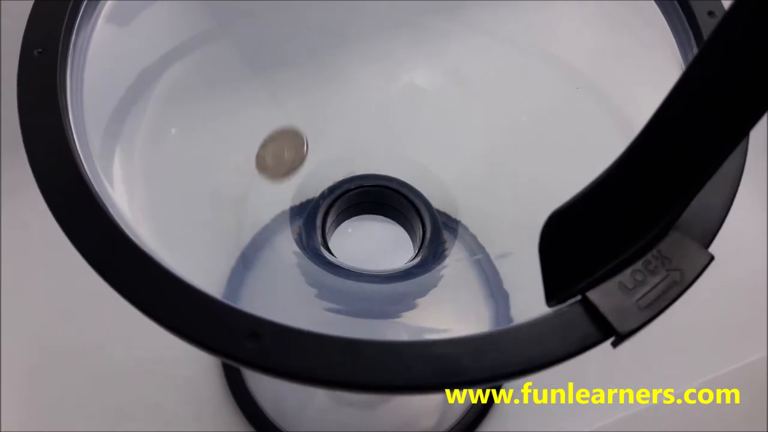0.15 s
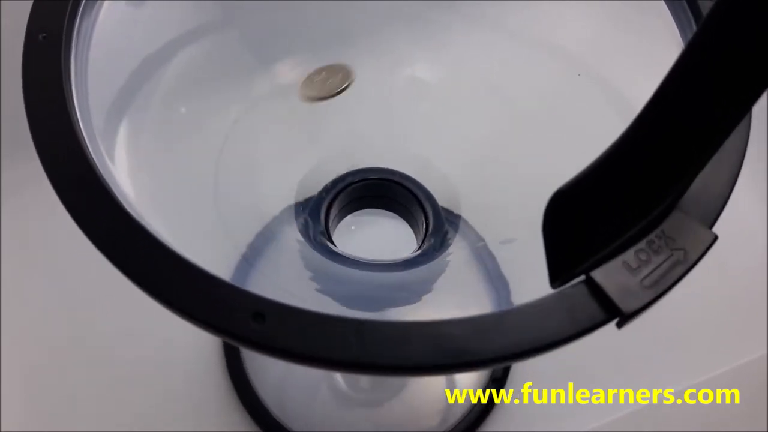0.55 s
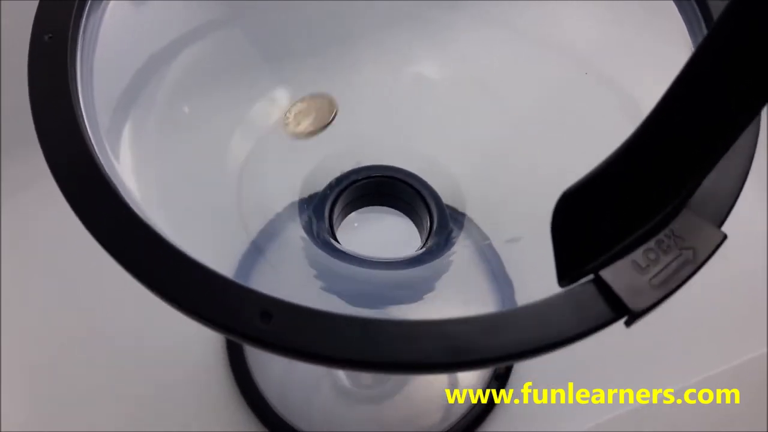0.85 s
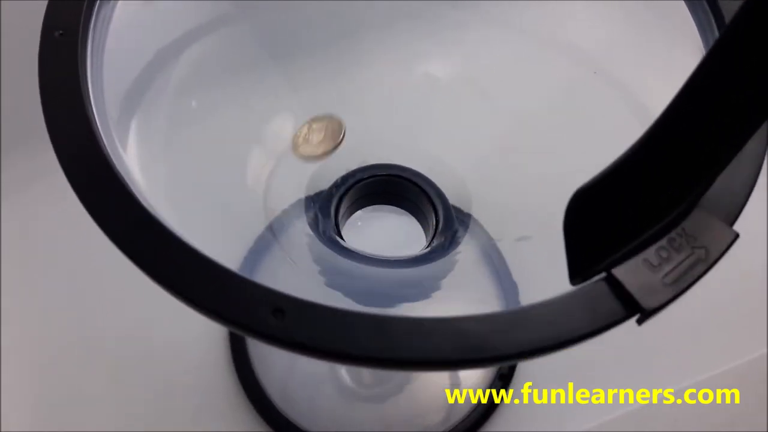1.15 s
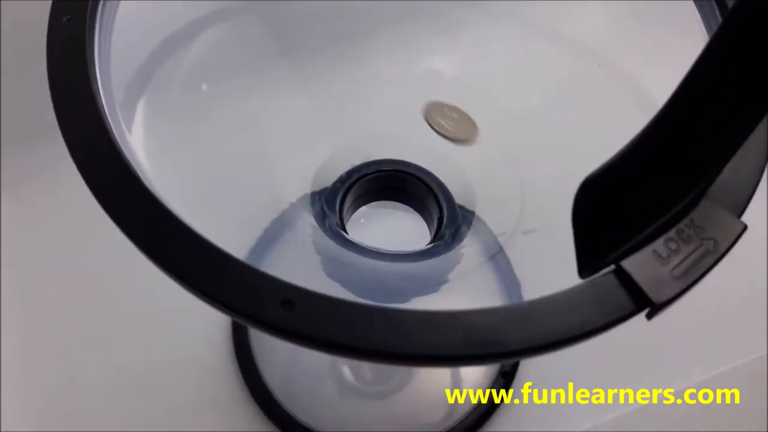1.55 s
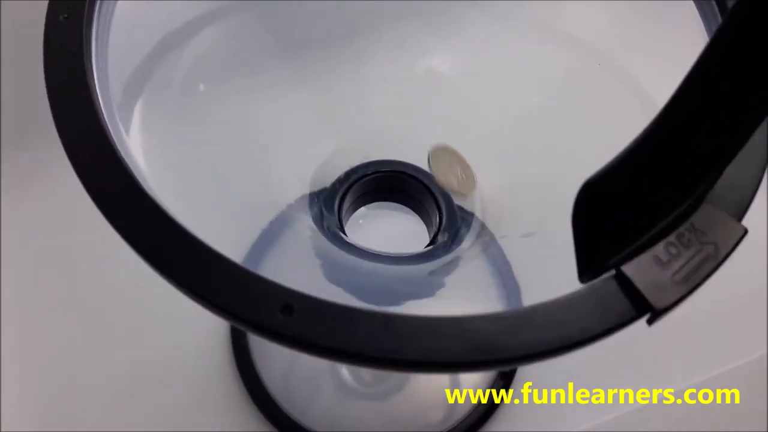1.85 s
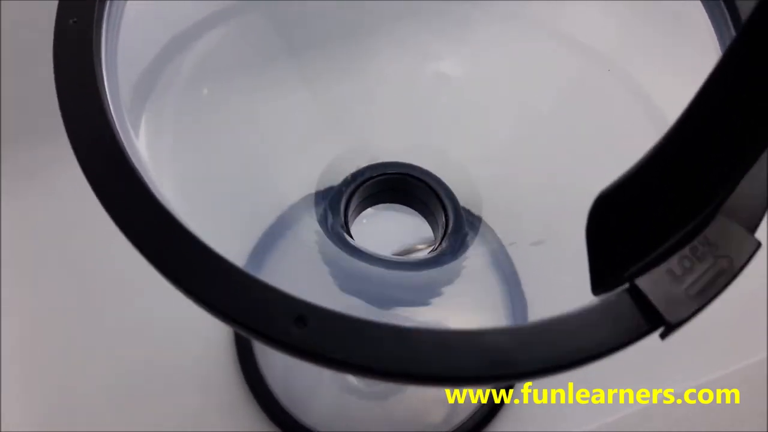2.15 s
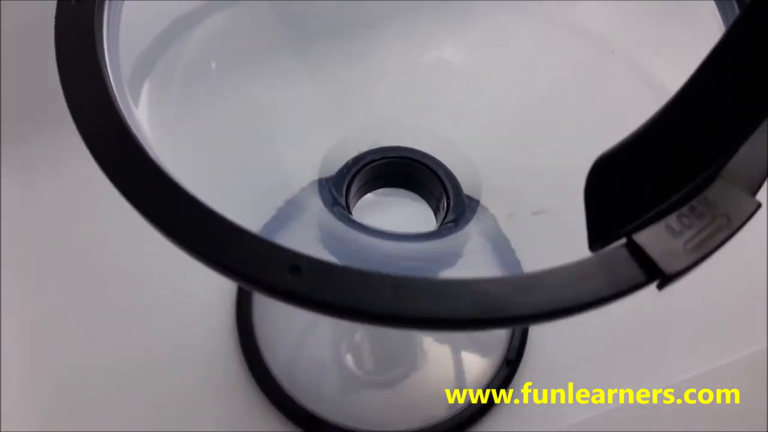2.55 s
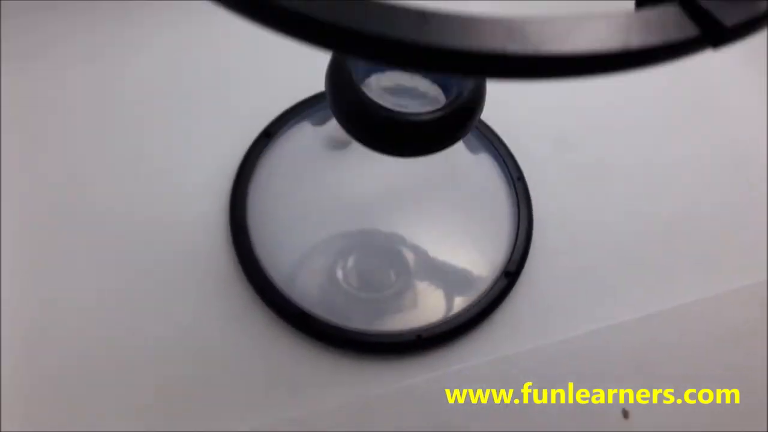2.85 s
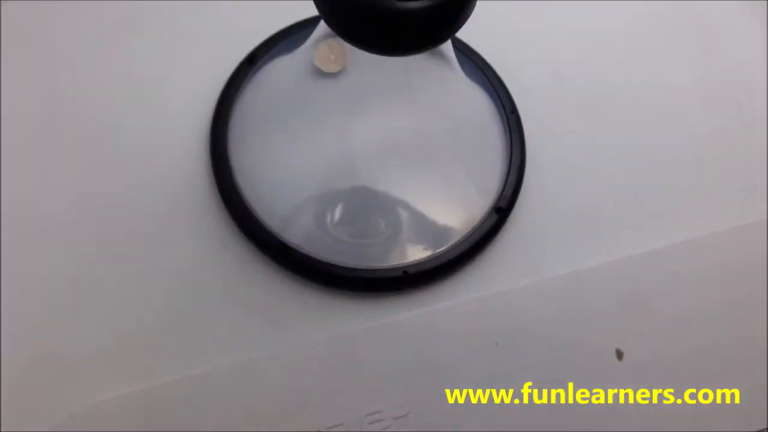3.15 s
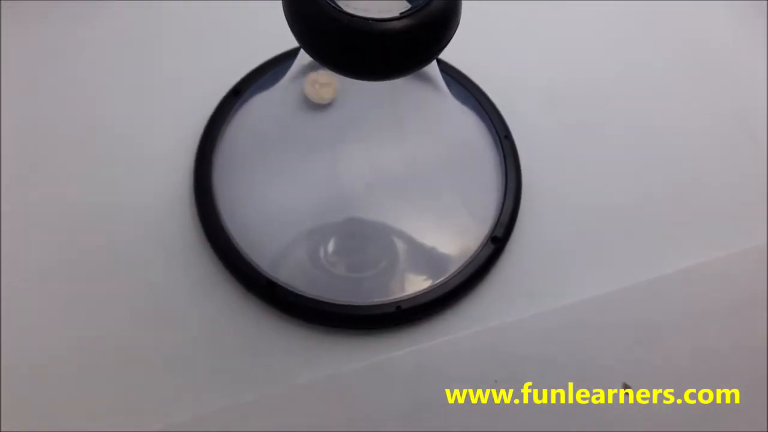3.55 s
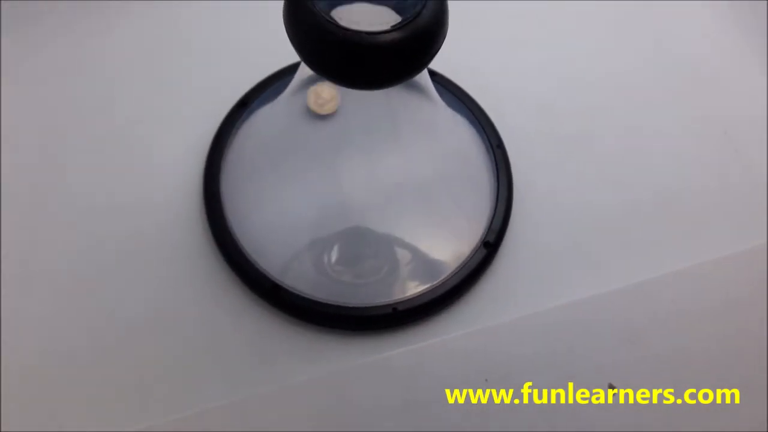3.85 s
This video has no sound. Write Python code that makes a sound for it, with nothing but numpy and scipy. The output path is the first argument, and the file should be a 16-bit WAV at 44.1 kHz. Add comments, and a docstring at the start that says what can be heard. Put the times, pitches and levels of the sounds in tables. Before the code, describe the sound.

Coin rolling on edge in a plastic funnel, then sharp clacks and quieter circling in the base below

```python
"""Over a low hum and faint air, a coin rolls on edge round a plastic funnel, turning faster overall:
random bumps ring the shell, harder once a turn, with short soft pings scattered through the roll.
At 2.1-2.3 s it rattles through the throat (noise bursts), rings high in flight (beating sines), then
lands with a boom in the hollow base and rolls on in circles. A short room tail follows each sound;
a gain control ducks at loud clacks and comes back about a second later."""
import sys
import numpy as np
from scipy import signal
from scipy.fft import rfft, irfft, next_fast_len
from scipy.io import wavfile
from scipy.ndimage import uniform_filter1d, minimum_filter1d, map_coordinates

SR = 44100
rng = np.random.default_rng(int(sys.argv[2]) if len(sys.argv) > 2 else 0)


def int16_out(signal):
    """Quantize to a 16-bit WAV file."""
    q = np.round(np.clip(np.atleast_2d(signal).T, -1, 1) * 32767)
    wavfile.write(sys.argv[1], SR, q.astype(np.int16))


N = 176400
LEFT_RIGHT_HALVES = np.array([[.5], [-.5]])  # splits a left-right difference


def amp(db):
    """Decibels to gain."""
    return 10 ** (np.asarray(db) / 20)


def unit(x):
    """Scaled to rms 1."""
    return x / np.sqrt(np.mean(x ** 2) + 1e-20)


def along(points, hz):
    """(f/Hz, value) points interpolated on a log-frequency axis."""
    f, v = np.transpose(points)
    return np.interp(np.log(hz + 1), np.log(f + 1), v)


def curve(rows):
    """(t/s, value) rows as one value per sample."""
    return np.interp(np.arange(N) / SR, *np.transpose(rows))


def wobble(knots_per_s):
    """Smooth random curve."""
    return map_coordinates(rng.standard_normal(1024), [np.arange(N) * knots_per_s / SR], mode="wrap")


def filtered(x, response):
    """x times a response of frequency."""
    n = x.shape[-1]
    m = next_fast_len(n + SR // 4)
    return irfft(rfft(x, m) * response(np.fft.rfftfreq(m, 1 / SR)), m)[..., :n]


def shell(x, colour, modes, tilt_db_per_oct=0, size=4096):
    """x through a minimum-phase filter: contact colour lifted or cut by the shell's resonances."""
    hz = np.fft.rfftfreq(size, 1 / SR)
    db = along(colour, hz) + tilt_db_per_oct * np.log2(hz + 50)
    db = db + sum(lift / (1 + (2 * (hz - f) / width) ** 2) for f, width, lift in modes)
    # folding the cepstrum makes the filter causal
    cepstrum = irfft(np.log(amp(db - db.max())))
    cepstrum[1:size // 2] *= 2
    cepstrum[size // 2 + 1:] = 0
    impulse = irfft(np.exp(rfft(cepstrum)))
    return signal.fftconvolve(x, impulse[None], axes=1)[:, :x.shape[1]]


# default stereo width: f/Hz, side minus mid/dB
SIDE_WIDTH = [(100, -13), (500, -7), (1000, -5), (1700, -0.5), (4000, 1.5), (12000, -1.5)]


def spread(pair, width=SIDE_WIDTH):
    """Two unrelated signals as left and right, alike in the bass."""
    def mid_side_gains(hz):
        side_gain = amp(along(width, hz))
        return np.array([np.ones_like(hz), side_gain]) / np.hypot(1, side_gain)
    mid, side = filtered(pair, mid_side_gains)
    return np.array([mid + side, mid - side])


def add(out, s, sound):
    """Mix a sound in at time s."""
    i = round(s * SR)
    out[:, i:i + sound.shape[1]] += sound[:, :N - i]


# hum lines: f/Hz, rms level/dB
HUM_LINES = [(48.6, -56.5), (104, -56.5)]
# room air colour: f/Hz, relative level/dB
AIR_COLOUR = [(25, -23), (100, 0.5), (200, -4.5), (500, 4.5), (2000, -16), (8000, -38), (16000, -38)]
AIR_RMS_DB = -46.5


def background():
    """Steady low sine, a wavering narrow-band line above it, and filtered noise as room air."""
    t = np.arange(N) / SR
    (low_hz, low_db), (high_hz, high_db) = HUM_LINES
    steady = amp(low_db) * unit(np.sin(2 * np.pi * low_hz * t))
    phase = 2 * np.pi * high_hz * t
    wavering = amp(high_db) * unit(wobble(12) * np.sin(phase) + wobble(13) * np.cos(phase))
    air = filtered(rng.standard_normal((2, N)), lambda hz: amp(along(AIR_COLOUR, hz)))
    return steady + wavering + amp(AIR_RMS_DB) * unit(spread(air))


# room decay: f/Hz, t60/s
ROOM_DECAY = [(150, 0.61), (1000, 0.37), (4000, 0.26), (12000, 0.19)]


def room(x):
    """Short noise tail in which each frequency dies at its own speed."""
    hz, t, z = signal.stft(rng.standard_normal((2, SR // 2)), SR, nperseg=256)
    decay = amp(-60 * t / along(ROOM_DECAY, hz)[:, None])
    tail = spread(signal.istft(z * decay, SR, nperseg=256)[1])
    tail = tail * (1 - np.exp(-np.arange(tail.shape[1]) / SR / 0.0011))
    return signal.fftconvolve(x, tail / np.linalg.norm(tail[0]), axes=1)[:, :N]


# base boom: f/Hz, level re landing/dB, t60/s
BOOM_MODES = [(231, -0.5, 0.13), (575, -9, 0.12)]
BOOM_RISE_S = 0.0033


def landing_boom():
    """The first base hit sets the base booming: decaying sines, alike on both sides."""
    out, t = np.zeros((2, N)), np.arange(SR) / SR
    s, landing_db = BASE_HITS[0][:2]
    for hz, db, t60 in BOOM_MODES:
        envelope = amp(landing_db + db - 60 * t / t60) * (1 - np.exp(-t / BOOM_RISE_S))
        add(out, s, (envelope * np.sin(2 * np.pi * hz * t))[None])
    return out


# coin's own ring: f/Hz, level re flight/dB, t60/s, beat/Hz
COIN_RING_MODES = [(11741, -17.5, .16, 7), (12285, -23.5, .3, 25)]
# coin bounces clear: t/s, level/dB
COIN_FREE_FLIGHTS = [(2.245, -15), (2.314, 0), (2.44, -11)]
COIN_SWELL_S = 0.035  # the ring swells as the coin falls clear


def coin_ringing():
    """The coin rings high in beating sine pairs whenever it flies free."""
    out, t = np.zeros((2, N)), np.arange(SR) / SR
    for s, flight_db in COIN_FREE_FLIGHTS:
        for hz, db, t60, beat_hz in COIN_RING_MODES:
            main = np.sin(2 * np.pi * (hz * t + rng.random((2, 1))))
            beating = .5 * np.sin(2 * np.pi * ((hz + beat_hz) * t + rng.random((2, 1))))
            envelope = amp(flight_db + db - 60 * t / t60) * (1 - np.exp(-t / COIN_SWELL_S))
            add(out, s, envelope * (main + beating))
    return out


# hard contact colour: f/Hz, relative level/dB
CRACK_COLOUR = [(100, -24), (2000, -18), (4400, 1.5), (7000, -3), (9000, -15), (15500, -17)]
CRACK_T60_S, CRACK_DB_PER_TILT = 0.048, 3.5  # brighter blows crack more: dB per (dB/oct)
SPOT_WIDTH_HZ, SPOT_LIFT_DB = 800, 6  # the struck spot favours one band
BLOW_RING_SHARE = 0.5  # part of the mode lift kept


def clacks(hits, colour, modes, crack_db):
    """Each blow: sharp crack plus fast-dying shell shudder, ringing less clearly than under the roll."""
    out, t = np.zeros((2, N)), np.arange(SR // 4) / SR
    modes = [(hz, width, lift * BLOW_RING_SHARE) for hz, width, *_, lift in modes]
    for s, db, tilt_db, t60, spot_hz in hits:
        burst = rng.standard_normal((2, len(t))) * amp(-60 * t / t60)
        shudder = shell(burst, colour, modes + [(spot_hz, SPOT_WIDTH_HZ, SPOT_LIFT_DB)], tilt_db)
        snap = rng.standard_normal((2, len(t))) * amp(-60 * t / CRACK_T60_S)
        crack = shell(snap, CRACK_COLOUR, [], tilt_db)
        crack_gain = amp(crack_db + CRACK_DB_PER_TILT * tilt_db)
        blow = spread(unit(shudder) + crack_gain * unit(crack))
        add(out, s, amp(db) * blow / blow[:, :SR // 140].std())  # level set over the first 7 ms
    return out


# coin against base: t/s, level/dB, tilt/(dB/oct), t60/s, favoured f/Hz
BASE_HITS = [(2.4195, -3, -0.11, 0.1, 2010), (2.428, -6, -.5, 0.1, 690), (2.531, -25.5, -0.59, .15, 2200),
             (2.5587, -9.5, 0.72, 0.04, 3400), (2.612, -27, -0.78, .08, 1500)]
# base blow colour: f/Hz, relative level/dB
BASE_CLACK_COLOUR = [(50, -24), (130, -8.5), (230, -10), (400, -2.5), (600, -1), (1200, -1), (2000, 1.5),
                     (3200, -2), (5500, -10), (9000, -20), (15500, -29)]


def base_clacks():
    """Coin strikes the hollow base, exciting its modes."""
    return clacks(BASE_HITS, BASE_CLACK_COLOUR, BASE_MODES, crack_db=-14.5)


# coin against throat: t/s, level/dB, tilt/(dB/oct), t60/s, favoured f/Hz
THROAT_HITS = [(2.139, -25, -3, 0.048, 1050), (2.162, -25, -1, 0.04, 1100), (2.170, -23.5, 0, 0.059, 2100),
               (2.180, -19, -0.5, 0.064, 2000), (2.217, -20, -1.5, 0.028, 1800),
               (2.2205, -7.5, -2.5, 0.05, 1770), (2.2255, -8, -2, 0.046, 2370),
               (2.231, -12, -5, 0.05, 1990), (2.2795, -3.5, 1, 0.052, 4200), (2.286, -16, 0, 0.043, 2200),
               (2.296, -7, -2, 0.076, 2190), (2.3014, -6.5, 0.5, 0.037, 2310)]
# throat blow colour: f/Hz, relative level/dB
THROAT_CLACK_COLOUR = [(200, -31.5), (500, -14.5), (1100, -7.5), (2200, 1.5), (3300, -1.5), (4800, -5.5),
                       (7000, -19), (9000, -18), (15500, -23)]


def throat_clacks():
    """Coin rattles through the throat, exciting the near-throat funnel modes."""
    return clacks(THROAT_HITS, THROAT_CLACK_COLOUR, FUNNEL_MODES, crack_db=-11.5)


PATCH_SIGMA_HZ, PATCH_SIGMA_S, PATCH_DEPTH_DB = 63, 0.018, 2.5


def patchy(x):
    """Narrow bands swell and fade independently: the moving coin feeds the resonances unevenly."""
    z = signal.stft(x, SR, nperseg=1024, noverlap=768)[2]
    cycles_per_hz = np.fft.fftfreq(z.shape[1], SR / 1024)[:, None]
    cycles_per_s = np.fft.fftfreq(z.shape[2], 256 / SR)
    spans = (cycles_per_hz * PATCH_SIGMA_HZ) ** 2 + (cycles_per_s * PATCH_SIGMA_S) ** 2
    smooth = np.exp(-2 * np.pi ** 2 * spans)
    field = unit(np.fft.ifft2(np.fft.fft2(rng.standard_normal(z.shape[1:])) * smooth).real)
    return signal.istft(z * amp(PATCH_DEPTH_DB * field), SR, nperseg=1024, noverlap=768)[1][:, :N]


PING_HZ, PING_SPREAD_OCT, PING_SCATTER_DB = 1972, 0.1006, 1.5
PING_T60_S, PING_RISE_S = 0.066, 0.0055


def pings(per_s):
    """Short soft pings of the shell, scattered at random through the roll, each at its own pitch; rms 1."""
    out, t = np.zeros((2, N)), np.arange(SR // 16) / SR
    shape = amp(-60 * t / PING_T60_S) * (1 - np.exp(-t / PING_RISE_S))
    for k, (when, pitch, size, phase) in enumerate(rng.standard_normal((400, 4))):
        s = abs(k + when) / per_s
        if s < N / SR - 1 / SR:
            hz = PING_HZ * 2 ** (PING_SPREAD_OCT * pitch)
            grain = np.sin(2 * np.pi * hz * t + phase * LEFT_RIGHT_HALVES)
            add(out, s, amp(PING_SCATTER_DB * size) * shape * grain)
    return unit(out)


# whirr stereo width: f/Hz, side minus mid/dB
ROLL_WIDTH = [(100, -10), (1000, -14), (2000, -3), (4000, -0.5), (12000, 6.5)]
# pings against whirr: t/s, level/dB
PING_LEVEL = [(0, -12.5), (1.2, -6), (1.95, -13), (3.7, -12.5)]
TREBLE_FROM_HZ = 1520


def roll(level, treble, turns, body, lead, swing_db, low_swing_db,
         bumps_per_s, scatter_db, uneven_db, pings_per_s):
    """Tiny bumps under the coin's edge ring the shell, harder once a turn, most so in the treble."""
    bumps = (rng.random(N) < bumps_per_s / SR) * amp(scatter_db * rng.standard_normal(N))
    force = bumps * amp(uneven_db * wobble(110)) * rng.choice([-1, 1], (2, N))
    whirr = unit(spread(patchy(body(force)), ROLL_WIDTH))
    rolling = whirr + amp(curve(PING_LEVEL)) * pings(pings_per_s)
    rolling = unit(filtered(rolling, lambda hz: np.exp(1j * LEFT_RIGHT_HALVES * along(lead, hz))))
    low = filtered(rolling, lambda hz: 1 / (1 + (hz / TREBLE_FROM_HZ) ** 8))
    high = rolling - low
    press = np.cos(2 * np.pi * turns)
    swung = low * amp(low_swing_db * press) + high * amp(curve(treble) + swing_db * press)
    return amp(curve(level)) * swung


# base roll colour: f/Hz, relative level/dB
BASE_ROLL_COLOUR = [(40, -28), (200, -9.5), (400, -6), (800, 0), (1300, 0), (2400, 1.5), (3000, -5.5),
                    (4500, -9), (7000, -18.5), (9000, -27), (15500, -32)]
# base resonances: f/Hz, width/Hz, lift/dB
BASE_MODES = [(293, 81, 11.7), (528, 38, 8.2), (776, 170, 10.5), (999, 49, 12), (1660, 88, 11),
              (2140, 1160, 4.75), (3480, 240, 2.6)]


def base_shell(force):
    """The base rings the same all the way round."""
    return shell(force, BASE_ROLL_COLOUR, BASE_MODES)


# rolling in base: t/s, level/dB
BASE_LEVEL = [(2.43, -69), (2.485, -27), (2.58, -29), (2.66, -32), (2.88, -30.5), (3.05, -29.5),
              (3.5, -31.5), (3.8, -30), (4, -33)]
# treble in base: t/s, level re low band/dB
BASE_TREBLE = [(2.5, -1), (4, 1)]
# left leads right: f/Hz, phase/rad
BASE_LEAD = [(100, 0.5), (800, 0.74), (880, 1.6), (1150, 1), (1700, 1.24), (2000, -2.5), (2300, .5),
             (4000, 1.04), (15000, 9)]
BASE_TURN_S, BASE_TURNS_PER_S, BASE_SPEEDUP_PER_S2 = 2.696, 11.6, 3.42


def base_rolling():
    """Coin circles in the base, speeding up steadily."""
    t = np.arange(N) / SR - BASE_TURN_S
    turns = BASE_TURNS_PER_S * t + BASE_SPEEDUP_PER_S2 * t ** 2 / 2
    settling_db = curve([(2.7, 7.1), (3.1, 4.6), (3.8, 2.9)])  # the coin's wobble evens out
    return roll(BASE_LEVEL, BASE_TREBLE, turns, base_shell, BASE_LEAD,
                swing_db=settling_db, low_swing_db=0.47 * settling_db, bumps_per_s=6000,
                scatter_db=3.0, uneven_db=1, pings_per_s=40)


# funnel roll colour: f/Hz, relative level/dB
FUNNEL_ROLL_COLOUR = [(40, -50), (130, -23.5), (250, -22.5), (450, -11.5), (800, -3), (1500, -4),
                      (2300, -6), (3200, -13.5), (4800, -17), (7000, -21), (9000, -32), (13000, -33.5),
                      (16000, -45)]
# funnel resonances: f/Hz, width/Hz, lift far out/dB, lift near throat/dB
FUNNEL_MODES = [(474, 40, 11, 11), (557.5, 73, 7, 8), (659, 51, -7.5, -12), (890, 103, 8.5, 0.5),
                (1048, 58, 7.5, 10.5), (1276, 44, 5, 4), (1457, 45, 9.5, 7), (1482, 92, -10.5, -5),
                (1623, 87, 4.5, 9), (1836, 110, 8.5, 8), (1980, 86, 6, 5.5), (2086, 168, 10, 9),
                (2558, 53, 8.5, 4.5), (4100, 1130, 6.5, 6.5)]
# nearness to throat: t/s, nearness/(0-1)
THROAT_NEARNESS = [(.6, 0), (1.9, 0.97)]


def funnel_shell(force):
    """The funnel's resonances shift in strength as the coin spirals in."""
    modes, near = np.array(FUNNEL_MODES), np.clip(curve(THROAT_NEARNESS), 0, 1)
    outer = unit(shell(force, FUNNEL_ROLL_COLOUR, modes[:, [0, 1, 2]]))
    inner = unit(shell(force, FUNNEL_ROLL_COLOUR, modes[:, [0, 1, 3]]))
    return (1 - near) * outer + near * inner


# rolling in funnel: t/s, level/dB
FUNNEL_LEVEL = [(0, -20), (.55, -22), (1.2, -21), (1.6, -21), (1.9, -20), (2.09, -20), (2.12, -26),
                (2.143, -18.5), (2.16, -22), (2.185, -20.5), (2.212, -31), (2.23, -78.5)]
# treble in funnel: t/s, level re low band/dB
FUNNEL_TREBLE = [(0, 2.5), (.1, -2), (.16, 0), (.4, 1.5), (.55, 1), (.75, 0.5), (.87, 1.5), (1.03, .5),
                 (1.3, 1), (1.6, -2.5), (1.7, -0.5), (1.83, -2.5), (2, -2), (2.14, -1.5), (2.18, -12)]
# coin rotation: t/s, turns
FUNNEL_TURNS = [(0, 0.078), (.371, 4.3), (.543, 6.8), (.872, 10.5), (1.17, 14.5), (1.336, 15.5),
                (1.616, 22.5), (1.974, 29.3), (2.18, 36)]
# left leads right: f/Hz, phase/rad
FUNNEL_LEAD = [(100, 0.5), (1050, .5), (1200, 1.3), (1520, -2.5), (1850, -1), (2020, 0.03), (2600, 0),
               (3050, 2), (3400, 1.5), (4300, 3.5), (5000, 4.5), (15000, 12)]


def funnel_rolling():
    """Coin spirals down the funnel on its edge."""
    return roll(FUNNEL_LEVEL, FUNNEL_TREBLE, curve(FUNNEL_TURNS), funnel_shell, FUNNEL_LEAD,
                swing_db=1.04, low_swing_db=0.4, bumps_per_s=5000,
                scatter_db=2.5, uneven_db=0.69, pings_per_s=50)


# stereo balance: f/Hz, left minus right/dB
BALANCE = [(60, -5.5), (400, -2.5), (750, -4.5), (1100, -2), (2300, -5.5), (3100, -2), (4300, -9),
           (6000, -5.5), (9000, 3), (15000, 1.5)]
ROOM_DB = -12.5


def scene():
    """Funnel, throat, base, room and background; most bands lean a little to the right."""
    rolling = funnel_rolling() + base_rolling()
    hits = throat_clacks() + base_clacks()
    coin = rolling + hits + coin_ringing() + landing_boom()
    mix = coin + amp(ROOM_DB) * room(coin) + background()
    return filtered(mix, lambda hz: amp(LEFT_RIGHT_HALVES * along(BALANCE, hz)))


CEILING_DB, ATTACK_S, HOLD_S, RELEASE_S = -12, 0.0016, 1.022, 0.44
PEAK_DB, TOP_HZ = -.3, 15900


def record(dry):
    """Gain drops quickly on a loud sound, holds, then recovers; peaks are rounded, the top is cut off."""
    power = np.abs(uniform_filter1d(np.mean(dry ** 2, axis=0), size=350)) + 1e-12
    needed_db = np.minimum(0, CEILING_DB - 10 * np.log10(power))
    hold, release = int(HOLD_S * SR), int(RELEASE_S * SR)
    # origins shift both windows into the past
    held_db = minimum_filter1d(needed_db, hold, origin=(hold - 1) // 2, mode="nearest")
    recovering_db = uniform_filter1d(held_db, release, origin=(release - 1) // 2, mode="nearest")
    gain_db = np.minimum(held_db, recovering_db)
    step = 1 / (ATTACK_S * SR)
    x = dry * amp(signal.lfilter([step], [1, step - 1], gain_db))
    rounded = x / (1 + (x / amp(PEAK_DB)) ** 6) ** (1 / 6)
    return filtered(rounded, lambda hz: hz < TOP_HZ)


dry = scene()
out = record(dry)
int16_out(out)
```